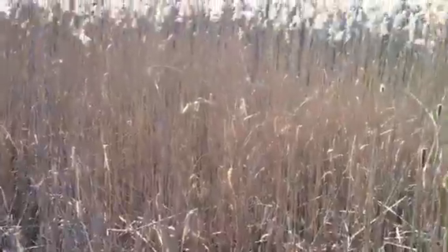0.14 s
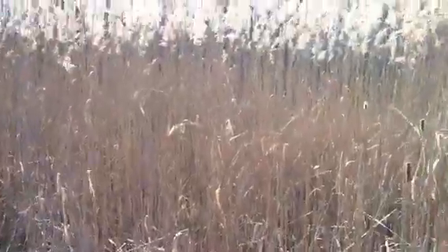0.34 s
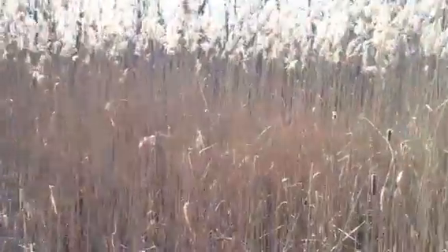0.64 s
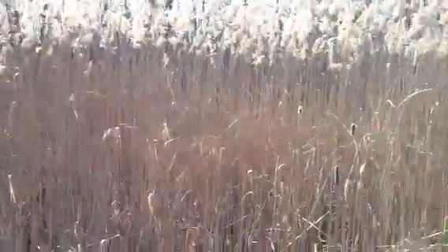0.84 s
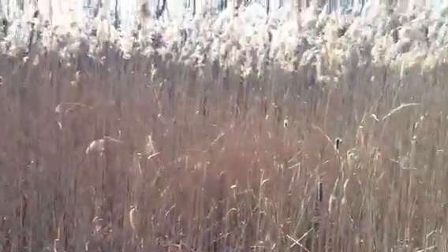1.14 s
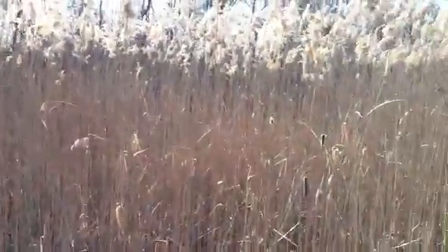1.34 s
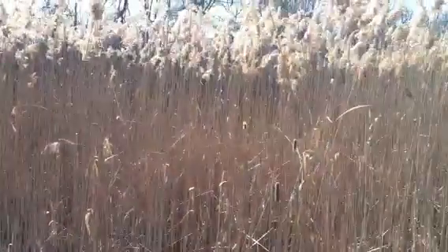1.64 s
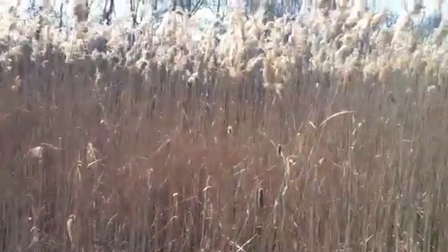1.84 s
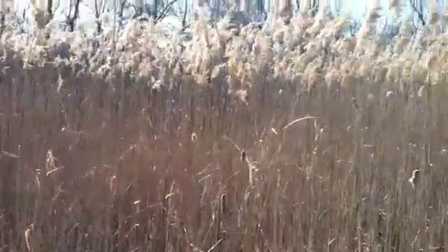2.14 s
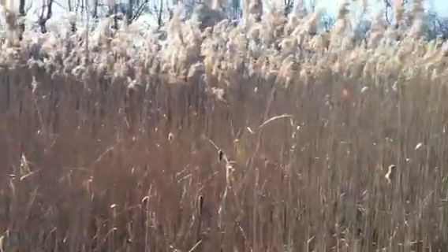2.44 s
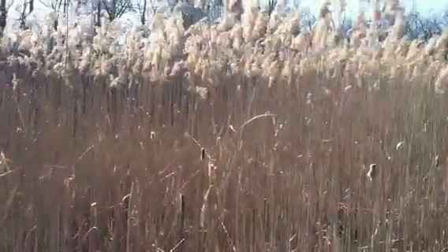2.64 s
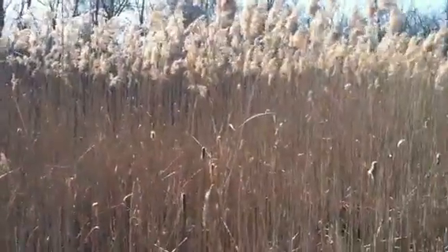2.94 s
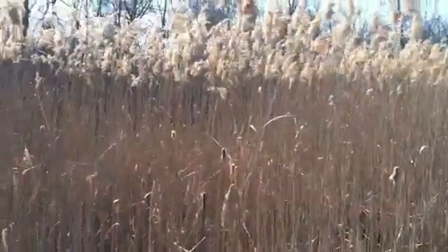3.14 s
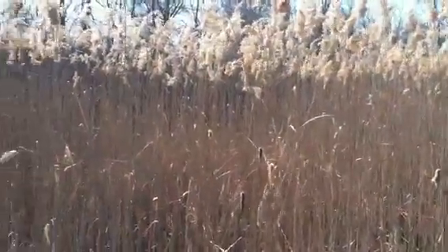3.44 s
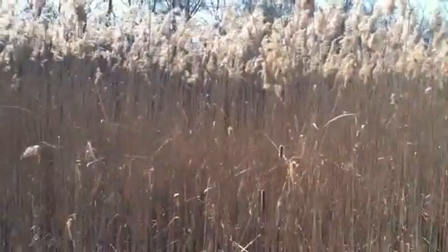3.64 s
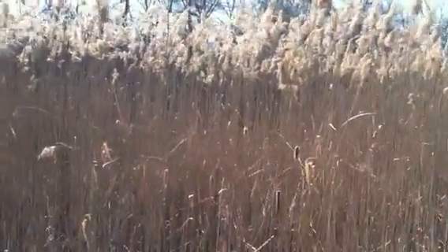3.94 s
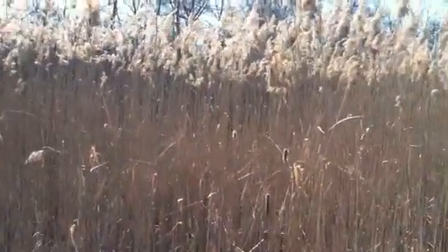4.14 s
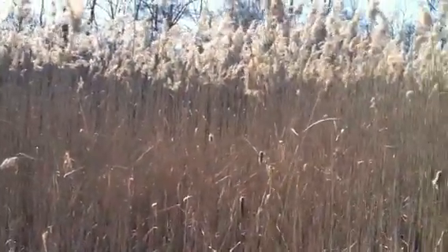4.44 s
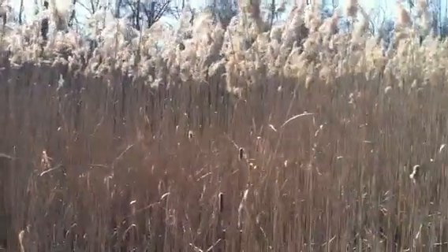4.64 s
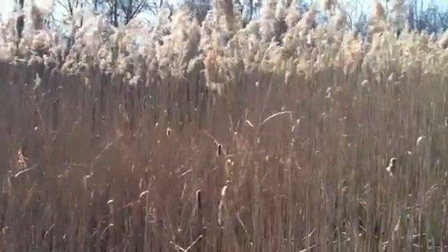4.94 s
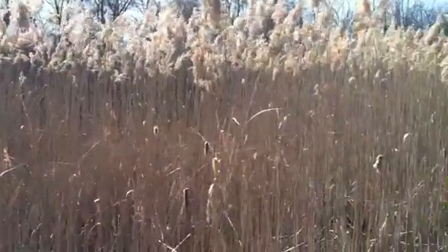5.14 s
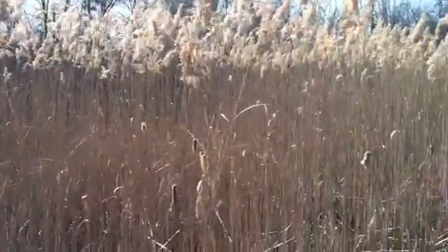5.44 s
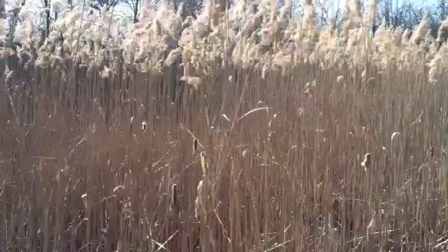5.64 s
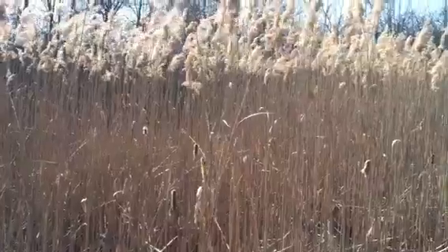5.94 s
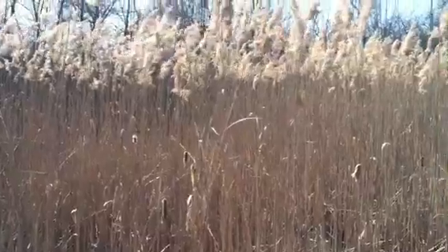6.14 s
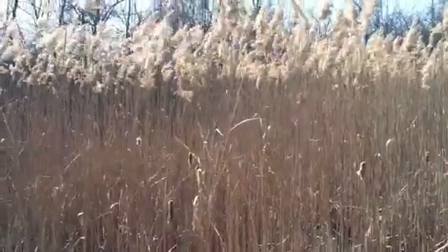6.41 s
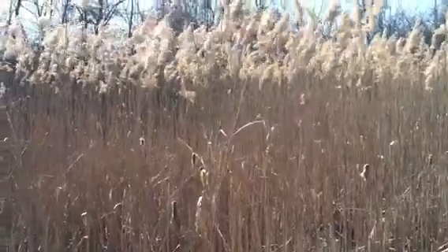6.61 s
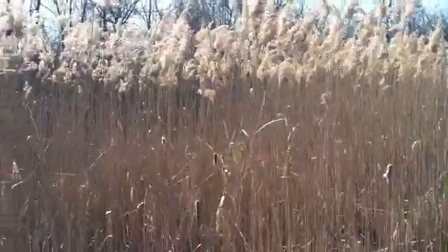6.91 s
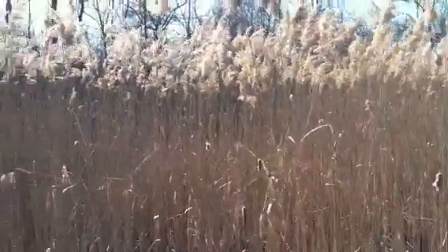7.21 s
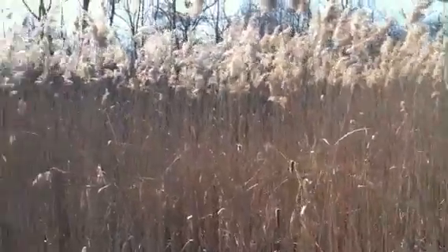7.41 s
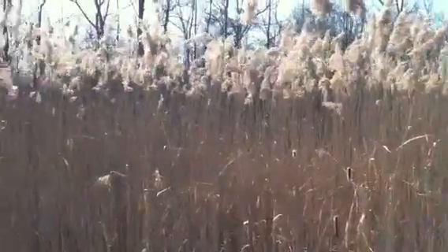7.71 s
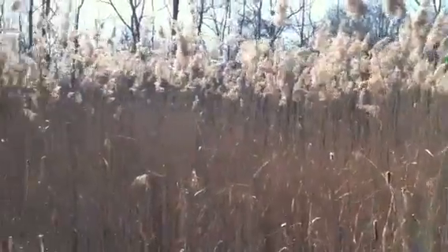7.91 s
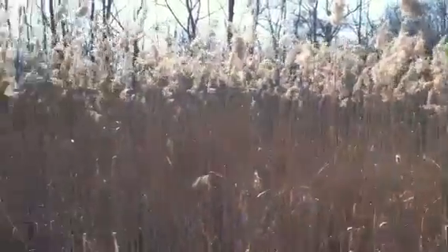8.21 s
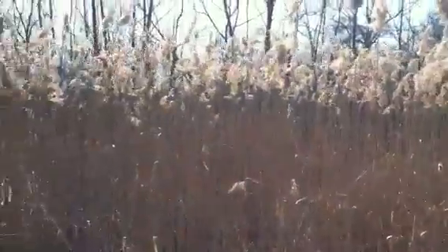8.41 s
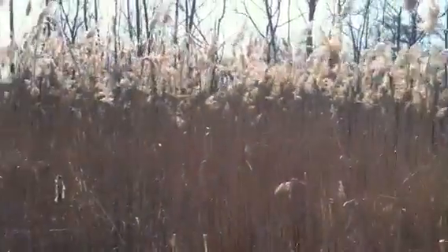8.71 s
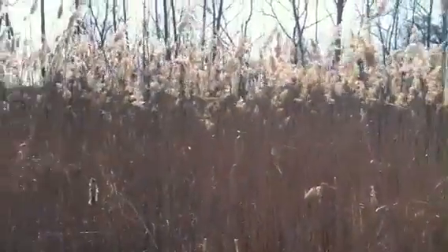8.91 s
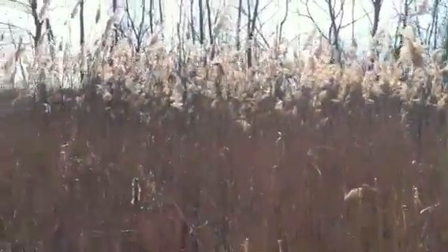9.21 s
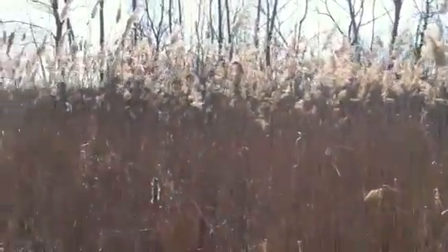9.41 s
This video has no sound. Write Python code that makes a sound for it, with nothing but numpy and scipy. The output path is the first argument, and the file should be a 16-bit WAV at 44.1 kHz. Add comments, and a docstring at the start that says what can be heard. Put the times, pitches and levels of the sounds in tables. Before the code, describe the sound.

A loud, unbroken chorus of small frogs fills an outdoor reed marsh. Callers near the microphone overlap in high, climbing trills, while the farther ones blur into a steady rasp. Two thin, faint bird whistles come early, and dry reeds rustle and tick lightly in the second half. Occasional soft plops sound under the frogs, with a low rumble from a far road and a gentle hiss of air.

```python
"""Small frogs calling all over a reed marsh in spring, heard from the edge of the reeds. Each call is a
trill of short ringing pulses that climbs in pitch while it slows; a few frogs close to the microphone
stand out of a crowd whose pulses scatter in the reeds. Something plops softly, dry stalks tick and
rustle, and a bird whistles twice. Behind a soft hiss of air, traffic rumbles and hums on a far road."""
import sys
import numpy as np
from scipy import signal
from scipy.fft import rfft, irfft, next_fast_len
from scipy.io import wavfile
from scipy.ndimage import uniform_filter1d

SR = 44100
rng = np.random.default_rng(int(sys.argv[2]) if len(sys.argv) > 2 else 0)


def write(x):
    x = np.atleast_2d(x).T
    wavfile.write(sys.argv[1], SR, np.round(np.clip(x, -1, 1) * 32767).astype(np.int16))


N = 421596


def from_db(db):
    """Decibels to gain."""
    return 10 ** (np.asarray(db) / 20)


def unit_power(x):
    """Scale a sound to unit power."""
    return x / np.sqrt(np.mean(x ** 2) + 1e-20)


def in_time(rows):
    """Each column of a curve at every sample; the rows start with a time in seconds."""
    times, *columns = np.transpose(rows)
    return [np.interp(np.arange(N) / SR, times, column) for column in columns]


def noise(spectrum):
    """Noise of unit power, coloured by rows of frequency in Hz and spectral level in dB."""
    hz, db = np.transpose(spectrum)
    bins = np.linspace(1, SR / 2, N + 1)
    gain = from_db(np.interp(np.log(bins), np.log(hz), db)) * np.minimum(bins / hz[0], 1)
    size = next_fast_len(N)
    gain = np.interp(np.linspace(0, N, size // 2 + 1), np.arange(N + 1), gain)
    return unit_power(irfft(rfft(rng.standard_normal(size)) * gain, size)[:N])


def split(x, hz):
    """The parts of a sound below and above a frequency."""
    return [signal.sosfilt(signal.butter(4, hz, kind, fs=SR, output="sos"), x)
            for kind in ("low", "high")]


def place(starts, sounds):
    """Sum short sounds, one per row, at their start times in seconds."""
    at = np.round(starts * SR).astype(int)[:, None] + np.arange(sounds.shape[1])
    inside = (at >= 0) & (at < N)
    return np.bincount(at[inside], sounds[inside], N)


def scatter(x, t60, tail_t60, tail_db):
    """Nearby stalks return a quick spray of echoes, the far trees a longer one."""
    t = np.arange(int(max(t60, tail_t60) * SR) + 2) / SR
    reeds = unit_power(from_db(-60 * t / t60))
    trees = from_db(tail_db) * unit_power(from_db(-60 * t / tail_t60))
    echoes = signal.oaconvolve(x, rng.standard_normal(len(t)) * (reeds + trees))[:N]
    return unit_power(echoes) * np.std(x)


def trill_pulses(trills, uneven_db, soft_start_db=12, end_fade_db=4.5, pure_start_db=6):
    """A trill's pulses start long, soft and pure, then come higher, shorter, brighter and slower."""
    first_stretch, last_stretch = 1.9, .95
    pulses = []
    for start, end, count, slowing, first_hz, last_hz, db, lift_db in trills:
        count = int(round(count))
        gaps = 1 + (slowing - 1) * np.linspace(0, 1, count - 1) ** 2
        elapsed = np.append(0, np.cumsum(gaps))
        along = elapsed / elapsed[-1]
        level = db - soft_start_db * np.exp(-along / .25) - end_fade_db * along ** 4
        level += uneven_db * rng.uniform(-.74, 1, count)
        hz = first_hz + (last_hz - first_hz) * along ** 1.25   # the climb steepens
        lift = lift_db - pure_start_db * (1 - along) ** 2
        stretch = first_stretch * (last_stretch / first_stretch) ** along
        pulses.append(np.column_stack([start + (end - start) * along, level, hz, lift, stretch]))
    return np.vstack(pulses)


def frog_voice(pulses, rise_s, length_spread, ring_db, ring_s, samples, partials=None):
    """Each pulse swells and falls within a few ms; the vocal sac's note, if present, rings on softly."""
    # Each row: multiple of the pitch, level in dB, relative length. The third is the sac's own note.
    call_partials = [(.41, -26, 0.89), (0.513, -18.5, 0.85), (1, 1.5, 0.93), (1.34, -22, 0.6),
                     (1.5, -21.5, 0.92), (2, -29.5, 0.63), (2.5, -47, 0.69), (3, -48, 0.35), (3.8, -50, .3)]
    at, db, hz, lift_db, stretch = np.float32(pulses).T[:, :, None]
    t = np.arange(samples, dtype=np.float32) / SR
    rise = np.float32(rise_s * stretch * np.exp(length_spread * rng.uniform(-1, 1, at.shape)))
    age = t / rise
    ring = np.float32(from_db(ring_db)) * np.tanh(age / 2) ** 2 * np.exp(-t / ring_s) * (1 - t / t[-1])
    sounds = 0
    for k, (multiple, partial_db, length) in enumerate(partials or call_partials):
        is_sac = k == 2
        own_age = np.maximum(1 + (age - 1) / float(length), 0)
        swell = own_age * np.exp(1 - np.minimum(own_age, 20))
        envelope = swell ** 3 + ring * is_sac
        phase = 2 * np.pi * (float(multiple) * hz * t + np.float32(rng.random(at.shape)))
        gain = np.float32(from_db(db + partial_db + (0 if is_sac else lift_db)))
        sounds = sounds + gain * envelope * np.sin(phase)
    return place((at - rise)[:, 0], sounds)


def near_frogs():
    """The callers closest to the microphone; an accent takes the place of any pulse it falls on."""
    # Each row: first and last pulse in seconds, pulse count, last gap over first gap, first and last
    # pitch in Hz, relative level in dB, lift of the side partials in dB.
    trills = [(-0.27, 0.363, 21.0, 2.23, 2990, 3415, -21.5, 3),
              (0.102, 0.897, 23.0, 2.32, 2816, 3430, -22.5, 0),
              (0.578, 1.315, 20.0, 2.38, 3030, 3526, -18, 1.0),
              (0.978, 1.565, 21.0, 2.05, 2920, 3360.0, -19, 4),
              (1.626, 2.242, 21.0, 1.99, 2755, 3420, -17, 0.5),
              (2.042, 2.717, 19.0, 2.2, 2830, 3440, -21.5, 0.7),
              (2.224, 2.959, 18.0, 1.84, 2695, 3360, -20, -0.2),
              (2.754, 3.33, 21.0, 1.9, 2813, 3336, -17.5, 1.5),
              (3.508, 4.051, 18.0, 2.26, 2770, 3300, -19, 3),
              (3.988, 4.486, 14.0, 2.26, 2900, 3180, -18.5, 2),
              (4.264, 4.985, 19.0, 1.72, 2675, 3285, -20.5, 3.5),
              (4.71, 5.303, 20.0, 2.08, 2797, 3480, -19.5, 6),
              (5.238, 5.829, 20.0, 2.08, 2912, 3440, -18, 3),
              (6.034, 6.562, 20.0, 1.63, 2820.0, 3280, -18, 2),
              (6.17, 6.876, 22.0, 1.75, 2940, 3374, -24.5, 3),
              (6.51, 7.155, 17.0, 1.87, 2640.0, 3150, -26, -3.5),
              (6.776, 7.473, 25.0, 1.78, 2910.0, 3356, -19, 2.5),
              (7.356, 8.032, 18.0, 2.35, 2840, 3510, -18, -1),
              (7.698, 8.363, 17.0, 1.36, 2945, 3420, -21, -2),
              (7.91, 8.469, 21.0, 1.96, 2840, 3240, -22, 3), (8.162, 8.885, 21.0, 1.6, 2900, 3470, -25, 2),
              (8.47, 9.117, 24.0, 1.75, 2820, 3370, -23.5, 4.5),
              (8.78, 9.504, 18.0, 2.11, 2760, 3174, -19.5, 0)]
    # Single pulses that ring out above the din. Each row: time in seconds, level in dB, pitch in Hz,
    # lift of the side partials in dB.
    accents = [(0.1821, -9, 3120.0, -5), (0.2215, -13, 3260, -5), (0.5574, -9, 3120, -15),
               (0.6045, -7, 3090, -20), (0.6563, -8, 3190, -5), (0.6744, -10.5, 3330, -15),
               (0.7784, -13.5, 3230, -1), (0.8428, -11, 3180, -2), (1.3633, -13, 3130, -1),
               (1.8198, -12.5, 2980, -5), (2.1243, -8.5, 3180, -1), (2.383, -12.5, 2980, -4),
               (2.591, -17.5, 3290, 5), (2.636, -12.5, 3130, -11), (2.6528, -8.5, 3270, -3),
               (2.7008, -11, 3280, -7.5), (2.7268, -9, 3270, -1.5), (2.7418, -11, 3220, -3),
               (2.8665, -11.5, 3050, -9), (3.0188, -13, 3000, -3.5), (3.0445, -11, 3040, -10),
               (3.1359, -12.5, 3000, -14.5), (3.2889, -13, 3120, 2.5), (3.3021, -12, 3310, -6.5),
               (3.3311, -9.5, 3240, 0.5), (3.9532, -11, 3220, 2), (4.0024, -10, 3270, 3),
               (4.4376, -11.5, 3280, -11), (4.7357, -8.5, 3140, -10), (4.8523, -10.5, 3170, -10),
               (4.9304, -8.5, 3210, -5), (4.9599, -11, 3120, -6), (4.9881, -11, 3130, -4),
               (5.022, -7.5, 3160, -4), (5.054, -14.5, 3150, 5), (5.5472, -10.5, 3090, -15),
               (6.3586, -10, 3130, -8.5), (6.4571, -11, 3250, -0.5), (7.156, -12, 3050, -2.5),
               (7.8227, -12.5, 3310, 1.5), (7.9708, -12, 3320, -10), (8.0128, -9, 3280, -1.5),
               (8.902, -12, 3010, -19)]
    pulses = trill_pulses(trills, uneven_db=2)
    accent_pulses = np.column_stack([accents, np.ones(len(accents))])
    apart = np.abs(pulses[:, :1] - accent_pulses[:, 0]).min(axis=1) > .006
    trilling = frog_voice(pulses[apart], rise_s=.002, length_spread=.1,
                          ring_db=-7, ring_s=.011, samples=1000)
    accented = frog_voice(accent_pulses, rise_s=.002, length_spread=.1,
                          ring_db=-10, ring_s=.0065, samples=600)
    direct = from_db(4) * trilling + accented
    return direct + from_db(-12) * scatter(direct, t60=.04, tail_t60=.3, tail_db=-6)


def crowd_trills(count=200, pulse_count=20, slowing=2, climb_hz=520, lift_db=1.5):
    """Farther frogs take turns; body size sets each one's pitch and distance its level."""
    start = np.linspace(-.7, N / SR, count) + rng.uniform(-.04, .04, count)
    end = start + rng.uniform(.56, .72, count)
    middle_hz = rng.triangular(2880, 3300, 3470, count)
    first_hz, last_hz = middle_hz - climb_hz / 2, middle_hz + climb_hz / 2
    db = rng.uniform(-2.2, 0, count)
    columns = np.broadcast_arrays(start, end, pulse_count, slowing, first_hz, last_hz, db, lift_db)
    return np.column_stack(columns)


def patch_of_reeds(pulses):
    """Each patch of reeds blurs the pulses with its own pattern of echoes."""
    direct = frog_voice(pulses, rise_s=.0019, length_spread=.2, ring_db=-6.5, ring_s=.011, samples=750)
    return direct + from_db(-2.5) * scatter(direct, t60=.05, tail_t60=.5, tail_db=-2)


def crowd(patches=6, divide_hz=3050, trims_db=(-5.5, -5)):
    """The din from several patches farther into the marsh; its low and high voices wax and wane."""
    # Each row: time in seconds, relative levels of the low and of the high voices in dB.
    levels = [(0.0, -24.5, -24), (1.44, -28, -24), (1.81, -26.5, -23), (2.0, -26, -24.5),
              (4.58, -26.5, -24.5), (4.87, -25, -22), (5.09, -27, -20.5), (5.3, -26.5, -27.5),
              (5.62, -27.5, -21.5), (5.911, -27.5, -24.5), (6.15, -25, -28), (6.39, -26, -23.5),
              (9.43, -26, -25.5), (9.56, -24, -22)]
    pulses = trill_pulses(crowd_trills(), uneven_db=4)
    din = sum(patch_of_reeds(pulses[k::patches]) for k in range(patches))
    low = signal.sosfiltfilt(signal.butter(8, divide_hz, fs=SR, output="sos"), din)
    chorus = 0
    for voices, level_db, trim_db in zip((low, din - low), in_time(levels), trims_db):
        even = voices / np.sqrt(uniform_filter1d(voices ** 2, size=12000) + 1e-9)
        chorus = chorus + even * from_db(level_db + trim_db)
    return chorus


def far_chorus():
    """The farthest frogs overlap into a steady rasp in which only their bands of pitch are left."""
    # Each row: frequency in Hz, relative spectral level in dB.
    rasp_spectrum = [(1100, -26), (1650, -12), (2200, -22.5), (2550, -5.5), (2750, 6), (2950, -6.5),
                     (3200, 9.5), (3450, 1.5), (3650, -8.5), (3950, -25.5), (4800, -10), (5500, -42.5)]
    return from_db(-34) * noise(rasp_spectrum)


def traffic(trim_db=-.74):
    """A far road: steady rumble, with a tyre drone that slowly grows."""
    # Each row: frequency in Hz, relative spectral level in dB.
    road_spectrum = [(15, -60.5), (25, -35), (48, -27), (120, 0), (167, 0.5), (259, -3), (420, -11),
                     (550, -46.5), (920, -120)]
    # Each row: time in seconds, relative levels of the deep rumble and of the tyre drone in dB.
    levels = [(0.0, -56, -52.5), (0.26, -55, -57), (9.21, -57.5, -49), (9.56, -62, -48)]
    bands = split(noise(road_spectrum), hz=196)
    return sum(unit_power(band) * from_db(db + trim_db) for band, db in zip(bands, in_time(levels)))


def air():
    """A soft steady hiss of air; the treble above 7 kHz flickers like compressed audio."""
    # Each row: frequency in Hz, relative spectral level in dB.
    hiss_spectrum = [(25, -15.5), (200, 0.5), (420, -1.5), (540, 3.5), (800, -1.5), (1200, -4),
                     (2200, -1.5), (5500, -8.5), (7500, -15), (10000, -20.5), (12800, -36), (15500, -58.5)]
    low, treble = split(from_db(-50) * noise(hiss_spectrum), hz=7000)
    coder_flicker_db = 4 * unit_power(uniform_filter1d(rng.standard_normal(N), size=350))
    return low + treble * from_db(coder_flicker_db)


def plops(swell_s=.0024):
    """Faint hollow blips that swell and die in about ten milliseconds and echo in the reeds."""
    # Each row: time of the peak in seconds, peak level in dB, pitch in Hz.
    blips = [(.064, -37, 895), (1.164, -38.5, 860), (3.314, -43.5, 1060), (4.138, -40.5, 870),
             (8.633, -41.5, 930), (8.796, -33, 890)]
    at, db, hz = np.transpose(blips)[:, :, None]
    t = np.arange(SR // 20) / SR
    swell = (t / swell_s * np.exp(1 - t / swell_s)) ** 2
    direct = place(at[:, 0] - swell_s, from_db(db) * swell * np.sin(2 * np.pi * hz * t))
    return direct + from_db(-6) * scatter(direct, t60=.04, tail_t60=.2, tail_db=-9)


def stalks(snaps_per_s=45):
    """Dry reeds give a thin tick now and then, and rub in grainy bursts full of tiny snaps."""
    # Each row: start in seconds, relative level in dB, seconds to fall by 60 dB.
    ticks = [(.412, -28, .006), (1.091, -30, .008), (2.795, -28.5, 0.096), (5.354, -25, 0.017),
             (5.373, -24, .015), (5.641, -31, 0.013), (5.681, -23, .02), (6.04, -40, .03),
             (7.022, -37, .025), (7.305, -42, .02), (7.341, -31, .025), (7.404, -40, .02),
             (8.238, -40, .015), (8.304, -38, .025)]
    # Each row: frequency in Hz, relative spectral level in dB.
    rustle_spectrum = [(1200, -8.5), (2100, 8.5), (5000, 3.5), (8000, 0), (11000, -3.5), (13000, -10),
                       (15500, -24)]
    grain = from_db(3.5 * unit_power(uniform_filter1d(rng.standard_normal(N), size=110)))
    impulses = (rng.random(N) < snaps_per_s / SR) * rng.uniform(1, 4, N)
    snaps = signal.lfilter([1], [1, -.96], impulses + 1e-18)
    starts, db, t60 = np.transpose(ticks)
    t = np.arange(SR // 10) / SR
    tick_envelope = place(starts, from_db(db[:, None] - 12 - 60 * t / t60[:, None]))
    friction = noise(rustle_spectrum)
    _, treble = split(friction, hz=6000)
    rustle = friction * rubbing() * (unit_power(grain) + from_db(4) * snaps)
    return rustle + tick_envelope * unit_power(treble)


def rubbing(release_share=.93):
    """How hard the stalks rub: each rub swells and dies a little faster, over a long faint stir."""
    # Each row: time of the peak in seconds, swell time in seconds, relative peak level in dB.
    rubs = [(5.065, 0.019, -45.5), (5.24, 0.021, -47), (5.35, 0.041, -47.5), (5.64, 0.06, -41.5),
            (7.05, .035, -52.5), (7.29, 0.02, -46.5), (7.43, .06, -58), (8.22, 0.16, -53.5)]
    stir = (6.7, 2.1, -58)
    power, t = 0, np.arange(N) / SR
    for peak_s, swell_s, db in [*rubs, stir]:
        away = (t - peak_s) / np.where(t < peak_s, swell_s, swell_s * release_share)
        power = power + from_db(db) ** 2 * np.exp(-np.minimum(away ** 2, 20))
    return np.sqrt(power)


def bird():
    """Two thin gliding whistles, nearly pure: a long one, then a short one."""
    # One list to a whistle. Each row: time in seconds, pitch in Hz, level in dB.
    whistles = [
        [(0.615, 6150, -57), (0.625, 6000, -44), (0.719, 5830, -50), (0.737, 5960, -41), (0.787, 6160, -52.5),
         (0.821, 6210, -33.5), (0.858, 6300, -36.5), (0.878, 6100, -43), (0.899, 5770, -58), (0.945, 5540, -51)],
        [(1.145, 6180, -53), (1.16, 6300, -41.5), (1.175, 6680, -49), (1.21, 6600, -52)],
    ]
    direct, t = 0, np.arange(N) / SR
    for whistle in whistles:
        hz, db = in_time(whistle)
        start, end = whistle[0][0], whistle[-1][0]
        gate = np.clip(np.minimum(t - start, end - t) / .005, 0, 1)
        direct = direct + gate * from_db(db) * np.sin(2 * np.pi * np.cumsum(hz) / SR)
    return direct + from_db(-6.5) * scatter(direct, t60=.053, tail_t60=.21, tail_db=-13)


def shrill_frog(pulse_count=18, slowing=1.8, first_hz=8900, last_hz=10050):
    """One frog of which only a high climbing overtone reaches the microphone, smeared by the reeds."""
    # Each row: first and last pulse in seconds, relative level in dB.
    calls = [(1.137, 1.633, -50), (2.903, 3.386, -49), (4.503, 5.01, -47.5), (6.522, 7.02, -46),
             (8.276, 8.75, -50.5)]
    trills = [(start, end, pulse_count, slowing, first_hz, last_hz, db, 0) for start, end, db in calls]
    direct = frog_voice(trill_pulses(trills, uneven_db=3), rise_s=.0007, length_spread=.3,
                        ring_db=-20, ring_s=.01, samples=400, partials=[(1, 0, 1)])
    return from_db(-2) * direct + from_db(1) * scatter(direct, t60=.05, tail_t60=.25, tail_db=-17.5)


def engine(hum_hz=266.8, width_hz=35, nearest_s=7.5, pass_s=1.8):
    """An engine's narrow hum swells and fades as it passes on the far road."""
    band = signal.butter(2, [hum_hz - width_hz / 2, hum_hz + width_hz / 2], "band", fs=SR, output="sos")
    hum = unit_power(signal.sosfilt(band, rng.standard_normal(N)))
    nearness = 1 / (1 + ((np.arange(N) / SR - nearest_s) / pass_s) ** 4)
    return from_db(-54.5) * nearness * hum


def scene():
    """Everything that reaches one microphone at the edge of the reeds."""
    frogs = near_frogs() + shrill_frog() + crowd() + far_chorus()
    return (frogs + bird() + stalks() + plops() + traffic() + engine() + air())[None]


def record(dry):
    """The treble is cut steeply above 15.7 kHz."""
    return signal.sosfilt(signal.ellip(10, .1, 80, 15700, fs=SR, output="sos"), dry)


dry = scene()
out = record(dry)
write(out)
```